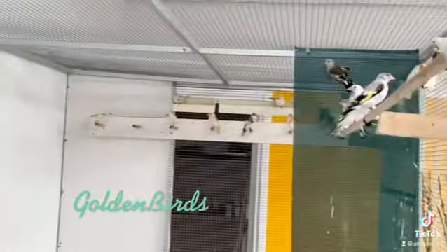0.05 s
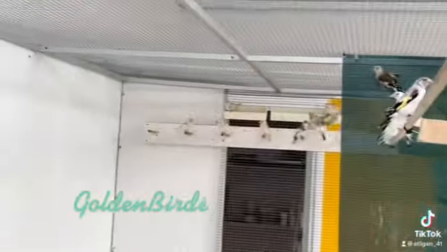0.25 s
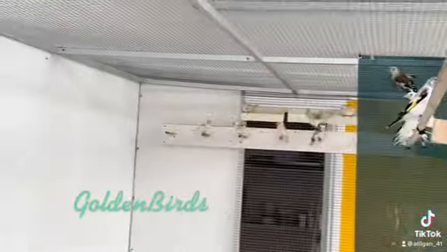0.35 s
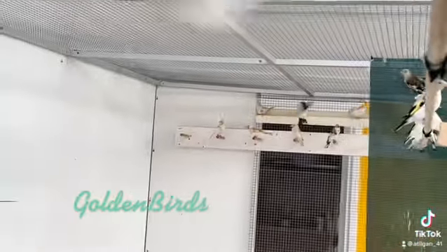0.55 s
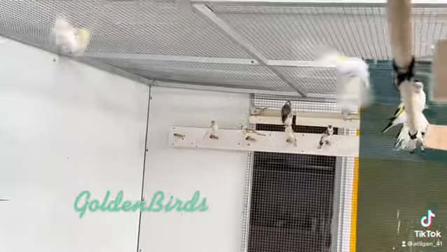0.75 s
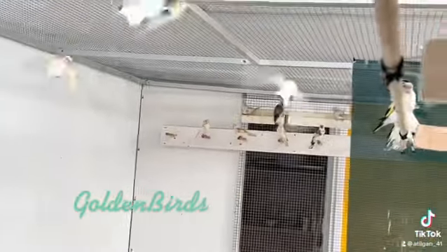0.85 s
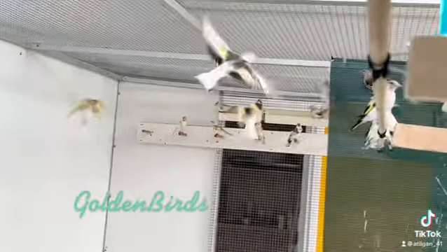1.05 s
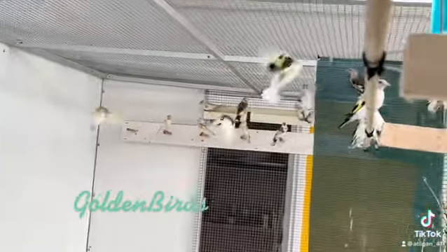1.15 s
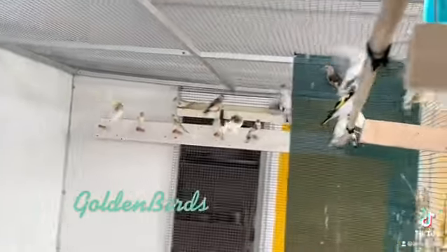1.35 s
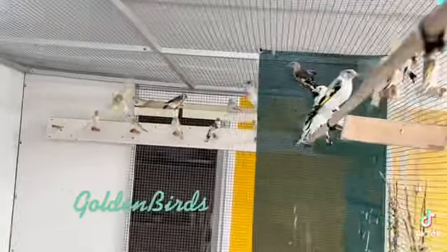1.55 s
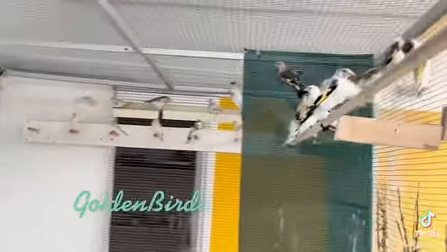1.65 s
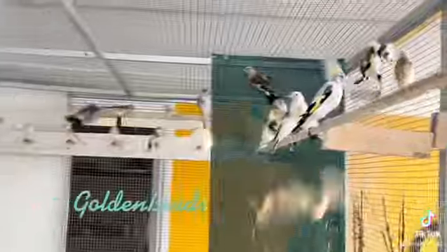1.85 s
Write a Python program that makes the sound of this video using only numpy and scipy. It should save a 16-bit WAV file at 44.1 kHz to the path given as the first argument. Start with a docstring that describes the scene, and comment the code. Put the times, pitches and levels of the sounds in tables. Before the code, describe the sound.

Finches chirping, whistling and flapping their wings in a slightly echoing aviary.

```python
"""Finches in an aviary

Many finches call in a walled, wire-roofed aviary. Close by, one gives rising whistles, another
two-voiced chips; each note is a gliding tone with overtones. The flock and one far, hoarse song
blur into the echo of the walls. Wings thump past over outdoor air noise and a low rumble."""
import sys
import numpy as np
from scipy import signal
from scipy.fft import rfft, irfft, next_fast_len
from scipy.io import wavfile

SR = 44100
rng = np.random.default_rng(int(sys.argv[2]) if len(sys.argv) > 2 else 0)


def dump_mix(stems):
    """Bounce the given channels to the path in sys.argv[1] as a 16-bit WAV at rate SR."""
    frames = np.atleast_2d(stems).T  # one column per channel
    limited = np.clip(frames, -1, 1)  # hard clip at full scale
    pcm = np.round(limited * 32767).astype(np.int16)
    wavfile.write(sys.argv[1], SR, pcm)


N = 83790


def from_db(db):
    return 10 ** (np.asarray(db) / 20)


def unit_rms(x):
    return x / np.sqrt(np.mean(x ** 2) + 1e-20)


def over_time(rows):
    times_s, values = np.transpose(rows)
    return np.interp(np.arange(N) / SR, times_s, values)


def at_hz(rows, hz):
    row_hz, values = np.transpose(rows)
    return np.interp(np.log(hz), np.log(row_hz), values)


def smooth(noise, corner_hz):
    pole = np.exp(-2 * np.pi * corner_hz / SR)
    return signal.lfilter([1], [1, -2 * pole, pole * pole], noise)


def drift(rate_hz):
    """Slow random wander, RMS 1."""
    return unit_rms(smooth(rng.standard_normal(N + SR), rate_hz)[SR:])


def add(out, start_s, x):
    i = max(int(start_s * SR), 0)
    out[i:i + len(x)] += x[:max(N - i, 0)]


def outdoor_air(level_db=-46.5, flicker_db=1.16, rumble_below_hz=300):
    """Third-octave bands of flickering stereo noise; the bass swells separately as a rumble."""
    # Each row: frequency in Hz, relative noise density in dB.
    spectrum = [(22, -5.5), (55, 0.5), (110, -2), (200, -9), (400, -14.5), (1400, -19.5), (2300, -23),
                (3300, -8.5), (4500, -27), (8500, -29), (11000, -43), (15800, -28)]
    # Each row: frequency in Hz, side minus mid in dB.
    width = [(60, -17.5), (150, -16), (380, -4.5), (950, -0.5), (1800, -1.5), (2400, -27), (7000, -57),
             (15000, -46)]
    # Each row: time in seconds, relative level of the rumble in dB.
    rumble_curve = [(.0, -55.5), (.3, -48), (.65, -49.5), (.9, -46), (1.05, -51.5), (1.52, -45), (1.9, -51)]
    # Each row: time in seconds, relative level of the higher bands in dB.
    upper_curve = [(.0, -1), (.5, 4.2), (.85, -1.5), (1.15, 0.5), (1.5, 6), (1.7, 5), (1.9, 4)]
    rumble_db, upper_db = over_time(rumble_curve), over_time(upper_curve)
    edges_hz = 22 * 2 ** np.arange(0, 9.7, 1 / 3)
    white = rng.standard_normal((2, 2, N + SR))
    flickers = [drift(rate_hz=21) for _ in range(4)]
    out = np.zeros((2, N))
    for k, (low_hz, high_hz) in enumerate(zip(edges_hz, edges_hz[1:])):
        band = signal.butter(2, [low_hz, high_hz], "band", fs=SR, output="sos")
        mid, side = signal.sosfilt(band, white[k % 2])[:, SR:]
        hz = np.sqrt(low_hz * high_hz)
        swell_db = rumble_db - rumble_db.mean() + 5.85 if hz < rumble_below_hz else upper_db
        gain = from_db(at_hz(spectrum, hz) + swell_db + flicker_db * flickers[k % 4])
        out += gain * (mid + from_db(at_hz(width, hz)) * side * [[1], [-1]])
    return from_db(level_db) * unit_rms(out)


def wall_echo(x, delay_s=0.0072, early_t60_s=0.09, early_db=11.5, tail_t60_s=0.51, side_db=-48):
    """Strong first reflections off the near walls and a diffuse tail, nearly mono."""
    t = np.arange(SR // 2) / SR
    decay = from_db(-60 * t / tail_t60_s) + from_db(early_db - 60 * t / early_t60_s)
    mid, side = rng.standard_normal((2, len(t))) * decay * (t > delay_s)
    mid /= np.linalg.norm(mid)
    side *= from_db(side_db) / np.linalg.norm(side)
    echo = signal.fftconvolve(x[None], np.array([mid + side, mid - side]), axes=1)[:, :N]
    stir_rad = 0.65 * drift(rate_hz=70)  # moving birds stir the echo, blurring its pitch
    return (signal.hilbert(echo) * np.exp(1j * stir_rad)).real


def bird_note(length_s, from_hz, to_hz, db, turn, turn_s, swell, fade, second_db, rasp, third_db=-60):
    """Uneven whistle gliding at fraction `turn` of its length. Returns sound, envelope, phasor."""
    progress = np.linspace(0, 1, max(int(length_s * SR), 8))
    glide = 0.5 + 0.5 * np.tanh((progress - turn) * length_s / turn_s)
    hz = from_hz + (to_hz - from_hz) * glide
    shape = progress ** swell * (1 - progress) ** fade
    unevenness = rasp * unit_rms(smooth(rng.standard_normal((2, 6000)), corner_hz=694))
    shake_rad, tremble = unevenness[:, :len(progress)]
    phasor = np.exp(2j * np.pi * np.cumsum(hz) / SR + 1j * shake_rad)
    envelope = np.sqrt(2) * from_db(db) * shape / shape.max() * np.abs(1 + tremble)
    lowness = hz.min() / hz  # overtones weaken at high pitch
    second = from_db(second_db) * lowness ** 3.1 * phasor ** 2
    third = from_db(third_db) * lowness ** 13.1 * phasor ** 3
    return envelope * (phasor + second + third).imag, envelope, phasor


def far_birds(notes_per_s=140, low_hz=2300, high_hz=6730, mean_length_s=0.02373):
    """The farthest birds: faint notes of random time, pitch, length and glide."""
    out = np.zeros(N)
    for when, pitch, glide, length, level in rng.random((500, 5))[:int(notes_per_s * N / SR)]:
        from_hz = low_hz * (high_hz / low_hz) ** (pitch ** 1.3)
        to_hz = from_hz * (1 + 0.3004 * (glide - 0.5))
        sound, _, _ = bird_note(mean_length_s * (0.5 + length), from_hz, to_hz, db=-58.5 + 6 * level,
                                turn=0.487, turn_s=0.0091, swell=1, fade=0.46, second_db=-5.5, rasp=0.56)
        add(out, when * N / SR, sound)
    return out


def far_song(waver_hz=70, rasp=0.81, ramp_s=0.01):
    """One held, hoarse line from a far perch; phase and amplitude shake."""
    # Each row: time in seconds, pitch in Hz, level in dB.
    contour = [(0.504, 4500, -61), (0.524, 4810, -47), (.565, 4780, -54.5), (.6, 4520, -51.5),
               (.65, 4464, -58), (.69, 4640, -52), (.76, 4435, -55), (.9, 4700, -54)]
    times_s, hz, db = np.transpose(contour)
    t = np.arange(N) / SR
    phase = 2 * np.pi * np.cumsum(np.interp(t, times_s, hz)) / SR + rasp * drift(waver_hz)
    gate = np.clip(np.minimum(t - times_s[0], times_s[-1] - t) / ramp_s, 0, 1)
    tremble = 1 + rasp * drift(waver_hz)
    return from_db(np.interp(t, times_s, db)) * gate * tremble * np.sin(phase)


def flock(half_echo_db=-45, nearness_db_per_db=0.72):
    """Soft notes from the perches, split into direct and wall-bound sound; louder is nearer, so drier."""
    # Each row: start and length in seconds, first and last pitch in Hz, level before the split in dB.
    notes = [(.0, 0.0675, 3632, 3730, -42.5), (.004, 0.031, 7740, 4470, -42.5),
             (0.022, 0.02, 5210, 4430, -37), (0.068, 0.06, 3326, 3367, -42),
             (0.074, 0.058, 3705, 3710, -44), (0.134, 0.085, 3395, 3467, -44.5),
             (0.396, 0.04, 3450, 3360, -44.5), (0.409, 0.048, 2830, 2640, -44),
             (0.464, 0.044, 2602, 2867, -46.5), (0.477, 0.022, 5300, 6150, -44.5),
             (0.507, 0.045, 3220, 3220, -47.5), (0.544, 0.047, 3400, 3510, -47),
             (.548, 0.012, 6040, 5560, -46.5), (0.666, 0.033, 5760, 5440, -53),
             (0.672, 0.013, 3440, 3540, -48), (0.695, 0.018, 2746, 2810, -48.5),
             (0.748, 0.021, 3970, 4190, -47), (0.814, 0.036, 6110, 5670, -51.5),
             (0.983, 0.024, 5500, 5160, -46), (1.042, 0.09, 2490, 2610, -52.5),
             (1.098, 0.039, 4500, 4160, -47), (1.145, 0.017, 7150, 7330, -40),
             (1.157, 0.029, 6150, 6040, -43), (1.214, 0.051, 5540, 5880, -46),
             (1.235, 0.052, 4200, 4060, -46), (1.236, 0.081, 2705, 2855, -45.5),
             (1.319, 0.01, 3415, 3420, -36.5), (1.369, 0.024, 3520, 3340, -37.5),
             (1.483, 0.017, 3680, 3490, -38), (1.605, 0.05, 3485, 3370, -44.5),
             (1.664, 0.032, 3050, 2920, -46.5), (1.745, 0.038, 2670, 2710, -51),
             (1.831, 0.01, 4600, 4770, -37)]
    direct, to_walls = np.zeros((2, N))
    for start_s, length_s, from_hz, to_hz, db in notes:
        sound, _, _ = bird_note(length_s, from_hz, to_hz, db, turn=0.499, turn_s=0.014,
                                swell=0.13, fade=0.087, second_db=-44, third_db=-58, rasp=0.11)
        direct_ratio = from_db(nearness_db_per_db * (db - half_echo_db))
        wall_share = sound / np.hypot(1, direct_ratio)
        add(direct, start_s, direct_ratio * wall_share)
        add(to_walls, start_s, wall_share)
    return direct, to_walls


def wing_beats(thump_hz=101.7, rise_s=0.005, feather_hz=(248, 608)):
    """Each beat is one low swing of air with a puff of feather noise."""
    # Each row: peak time in seconds, level in dB, feather noise relative to that level in dB.
    beats = [(.228, -42, -7), (0.557, -44, -6), (0.872, -42.5, -9.5), (0.905, -39.5, -4), (0.923, -48, 0.5),
             (0.946, -37, -7.5), (.963, -47, -3), (.987, -39, -14), (1.006, -50.5, -14), (1.374, -50.5, 2),
             (1.406, -45, -6.5), (1.503, -40, -2), (1.552, -37, -17), (1.591, -51.5, 4.5)]
    out = np.zeros(N)
    t = np.arange(int(0.055 * SR)) / SR
    envelope = np.e * t / rise_s * np.exp(-t / rise_s)
    band = signal.butter(1, feather_hz, "band", fs=SR, output="sos")
    puffs = unit_rms(signal.sosfilt(band, rng.standard_normal((len(beats), len(t)))))
    variations = rng.uniform(-0.88, 1, (len(beats), 2))
    for (peak_s, db, feather_db), (detune, polarity), puff in zip(beats, variations, puffs):
        push = np.sign(polarity) * np.sin(2 * np.pi * thump_hz * (1 + 0.25 * detune) * t)
        add(out, peak_s - rise_s, from_db(db) * envelope * (push + from_db(feather_db) * puff))
    return out


def near_whistles():
    """A close finch gives short rising whistles."""
    # Each row: start and length in seconds, first and last pitch in Hz, level in dB.
    notes = [(0.777, 0.027, 3033, 3253, -26.5), (0.974, 0.026, 3070, 3215, -32.5),
             (1.314, 0.031, 2817, 3920, -27), (1.399, 0.035, 2818, 3840, -25),
             (1.499, 0.028, 2642, 3610, -25), (1.612, 0.033, 2710, 3700, -30)]
    out = np.zeros(N)
    for start_s, *note in notes:
        sound, _, _ = bird_note(*note, turn=0.7, turn_s=0.0048, swell=1.48, fade=0.48,
                                second_db=-14.5, third_db=-21, rasp=0.046)
        add(out, start_s, sound)
    return out


def near_chips(sum_tone_db=-28, side_tone_db=-19):
    """A close finch chips with two voices, a and b, which mix in the throat into two more tones."""
    # Each row: start and length in seconds, first and last pitch in Hz and level in dB of voice a,
    # the same three for voice b, delay of b in seconds, rasp from 0 to 1.
    chips = [(0.208, 0.027, 7540, 6630, -20, 5140, 5457, -25, 0.0049, 0.11),
             (0.319, 0.024, 6510, 5350, -23.5, 5175, 4630, -30.5, 0.0036, 0.27),
             (1.138, 0.027, 6780, 6270, -36.5, 5540, 5820, -42.5, 0.0028, 0.49),
             (1.264, 0.022, 7100, 6490, -38.5, 5960, 5350, -37, 0.0024, 0.42)]
    timbre = dict(turn=0.076, turn_s=0.0082, swell=1.19, fade=1, second_db=-16.5)
    out = np.zeros(N)
    for start_s, length_s, *voices, delay_s, rasp in chips:
        sound_a, envelope_a, phasor_a = bird_note(length_s, *voices[:3], rasp=rasp, **timbre)
        sound_b, envelope_b, phasor_b = bird_note(length_s, *voices[3:], rasp=rasp, **timbre)
        sum_tone = from_db(sum_tone_db) * phasor_a * phasor_b  # fa + fb
        side_tone = from_db(side_tone_db) * phasor_a ** 2 / phasor_b  # 2 fa - fb
        add(out, start_s, sound_a)
        add(out, start_s + delay_s, sound_b)
        add(out, start_s + delay_s / 2, np.sqrt(envelope_a * envelope_b) * (sum_tone + side_tone).imag)
    return out


def scene(near_echo_db=-8, song_echo_db=2):
    """Birds, their echo, wings and air; the farthest birds are heard only as echo."""
    near = near_whistles() + near_chips()
    flock_direct, flock_to_walls = flock()
    song = far_song()
    to_walls = from_db(near_echo_db) * near + flock_to_walls + from_db(song_echo_db) * song + far_birds()
    echo = wall_echo(to_walls)
    return near + flock_direct + song + wing_beats() + echo + outdoor_air()


def record(dry):
    """The two microphone ports differ in phase by frequency; the top treble is cut."""
    # Each row: frequency in Hz, phase lead of left over right in radians.
    port_phase = [(1900, .0), (2400, .3), (3100, .66), (3700, .66), (5300, .38), (6800, .1), (8700, -.3),
                  (10200, -3.1), (12200, -6.3), (14000, -9.4), (15700, -12.4)]
    stopband_hz, stopband_db = 16300, 70
    size = next_fast_len(N + 4096)
    bin_hz = np.arange(size // 2 + 1) * SR / size
    lead_rad = at_hz(port_phase, bin_hz + 1)
    rotation = np.exp(0.5j * lead_rad * np.array([[1], [-1]]))
    ports = irfft(rfft(dry, size) * rotation, size)[:, :N]
    return signal.sosfilt(signal.cheby2(14, stopband_db, stopband_hz, fs=SR, output="sos"), ports)


dry = scene()
out = record(dry)
dump_mix(out)
```